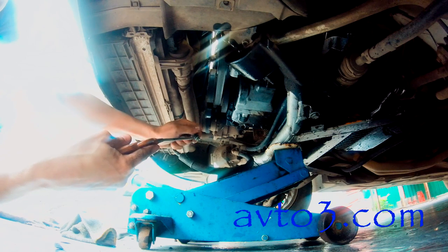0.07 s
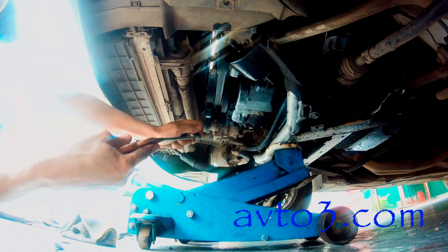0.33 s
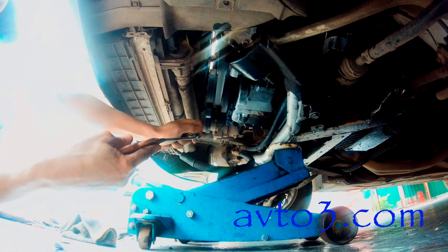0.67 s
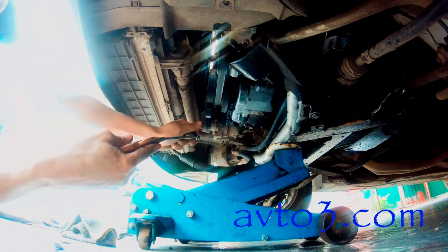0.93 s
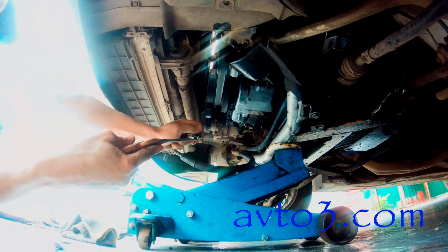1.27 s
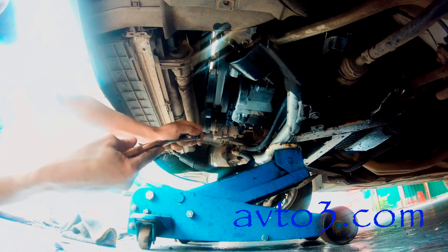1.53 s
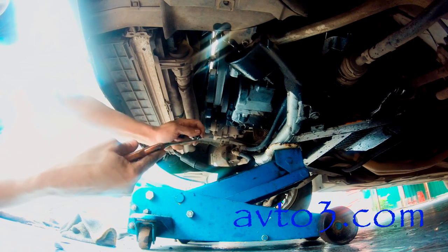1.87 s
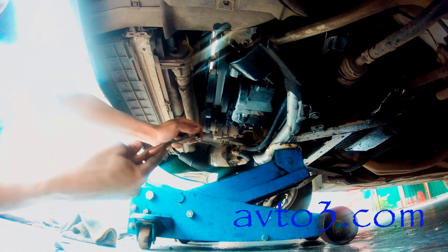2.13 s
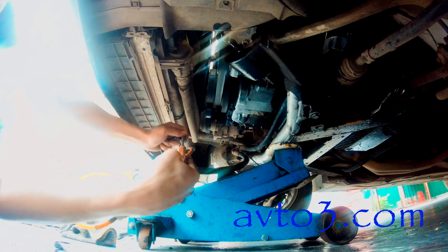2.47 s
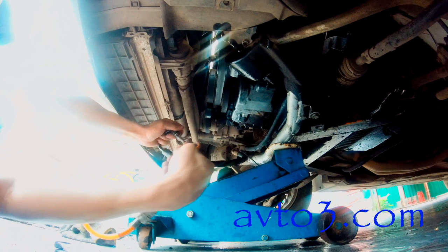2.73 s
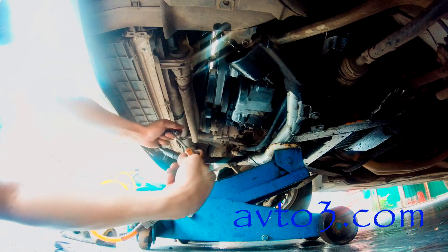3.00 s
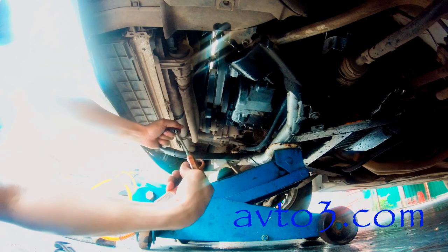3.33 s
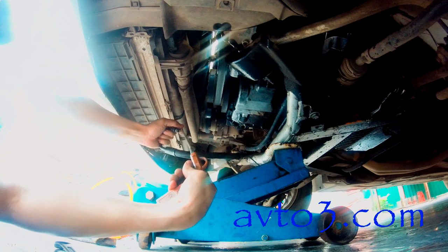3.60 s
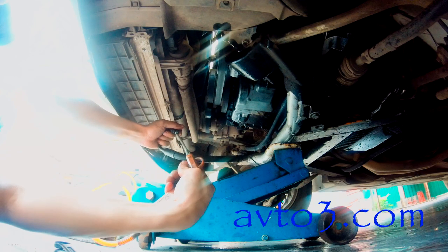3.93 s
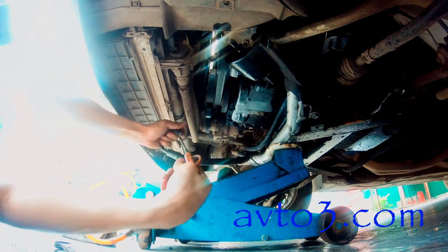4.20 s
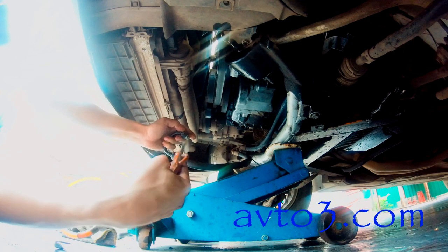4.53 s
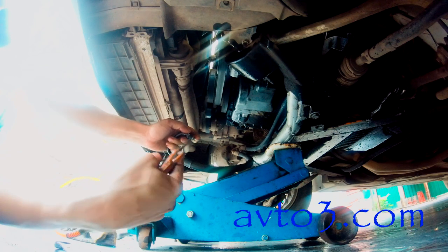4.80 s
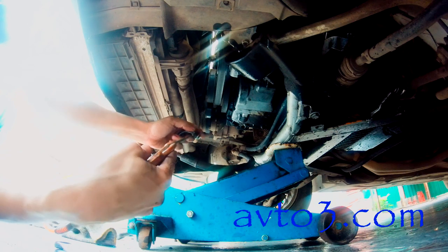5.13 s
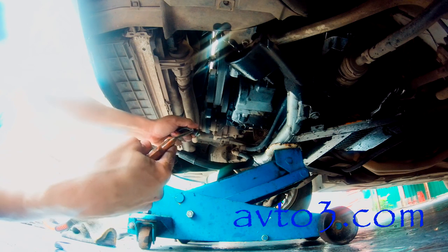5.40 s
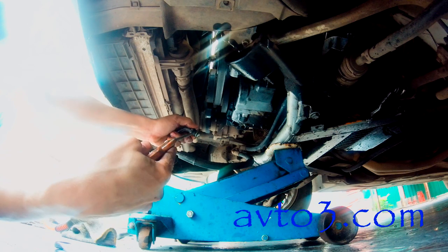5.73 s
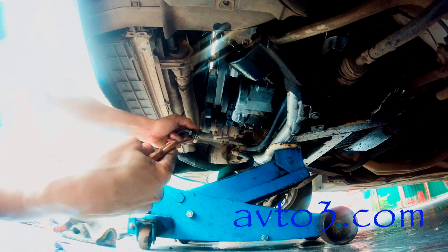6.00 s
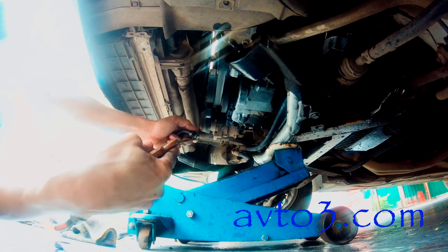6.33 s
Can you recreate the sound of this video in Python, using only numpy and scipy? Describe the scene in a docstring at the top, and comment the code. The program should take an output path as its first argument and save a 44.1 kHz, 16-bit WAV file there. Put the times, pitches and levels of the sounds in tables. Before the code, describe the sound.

Compressed air hisses loudly and without a break from a blow gun into a hose fitting, with spurts and brief whistles.

```python
"""Under a car, a blow gun hisses without a break into a hose fitting, close to a mono microphone.
As the hand moves the nozzle, the turbulent jet glances past or hits it in blasts and quick spurts;
it splashes on metal, whistles over edges, sings in pockets and hoots across the bore.
Resonances of the fitting and the underbody colour the noise. Dirt spits out, trapped air puffs,
and stray air rumbles over the microphone."""
import sys
import numpy as np
from scipy import signal
from scipy.fft import rfft, irfft, next_fast_len
from scipy.io import wavfile
from scipy.ndimage import map_coordinates

SR = 44100
rng = np.random.default_rng(int(sys.argv[2]) if len(sys.argv) > 2 else 0)


def transcribe(signal):
    """Save signal, clipped to [-1, 1], as a 16-bit WAV file at the path in sys.argv[1]."""
    frames = np.atleast_2d(signal).T
    limited = np.clip(frames, -1, 1)
    pcm = np.round(limited * 32767).astype(np.int16)
    wavfile.write(sys.argv[1], SR, pcm)


N = 284930
FRAME = 1024  # samples

# spectrum of stray air: (frequency [Hz], relative level [dB])
DRAUGHT_SPECTRUM = [(15, -7), (35, -3), (70, -1.5), (130, -1), (220, -1), (330, -4.5), (600, -30),
                    (2000, -100)]
# deflected air sweeps over the microphone: (start [s], end [s], added rumble [dB])
DRAUGHT_GUSTS = [(.6, .85, 7), (1.5, 1.75, 3.5), (2.05, 2.5, 7), (4.35, 4.95, 6), (4.62, 4.873, 8.5)]
# puffs of trapped air and spits of dirt:
# (peak time [s], length [s], frequency [Hz], width [Hz], level [dB])
PUFFS_AND_SPITS = [(.655, 0.062, 190, 110, -41.5), (1.172, 0.0066, 6500, 1500, -19),
                   (1.206, .003, 6500, 3500, -14), (1.674, 0.037, 390, 90, -33),
                   (2.103, 0.049, 199, 130, -38.5), (2.123, .006, 6960, 6000, -14),
                   (2.15, 0.0082, 8500, 3500, -16), (2.324, 0.014, 1520, 200, -18.5),
                   (2.498, 0.035, 333, 90, -33), (2.575, 0.043, 170, 90, -39), (3.32, 0.072, 170, 70, -44),
                   (3.685, 0.024, 300, 170, -34), (3.73, 0.028, 287, 220, -29),
                   (3.86, 0.018, 440, 170, -24.5), (3.874, 0.011, 1480, 200, -18.5),
                   (4.002, 0.017, 1520, 350, -16), (4.0, .025, 564, 350, -27.5),
                   (4.016, .008, 5000, 3000, -14), (4.596, 0.017, 1600, 900, -22),
                   (4.634, 0.011, 1390, 1200, -22.5), (4.696, 0.0094, 1510, 1400, -21.5),
                   (4.70, .12, 280, 200, -35.5), (4.724, .009, 4700, 600, -24),
                   (4.731, 0.012, 3900, 600, -23.5), (4.798, 0.0069, 1700, 2000, -19.5),
                   (4.89, 0.053, 326, 110, -34.5)]
# modes of the fitting's bore: (frequency [Hz], width [Hz])
BORE_MODES = [(1450, 150), (3340, 260), (4280, 200)]
# upper modes of the bore when blown hard: (frequency [Hz], width [Hz], relative level [dB])
OVERBLOWN_MODES = [(2460, 80, -5.5), (4700, 160, -1), (5200, 120, -2), (5900, 110, 1), (6340, 130, -20),
                   (7000, 80, -11), (7480, 110, -4), (8350, 220, -18), (10400, 250, 0), (11400, 180, 0.5),
                   (13100, 120, -10), (13800, 200, -7)]
# the jet crosses the bore: (start [s], end [s], mode 1 [dB], mode 2 [dB], mode 3 [dB], overblown [dB])
BORE_CROSSINGS = [(1.628, 1.701, -28.5, -36, -26, -43), (1.756, 1.827, -32.5, -42, -26, -44),
                  (1.859, 1.935, -39, -42, -25, -46), (2.291, 2.327, -27.5, -31, -16.5, -31),
                  (2.325, 2.39, -39, -45, -26, -41), (3.861, 3.982, -35, -27.5, -27, -29.5),
                  (3.976, 4.035, -29, -22, -27, -30), (4.111, 4.184, -34, -30, -36, -37)]
# the jet lingers on a gap or pocket: (start [s], end [s], frequency [Hz], width [Hz], level [dB])
POCKET_TONES = [(0.031, .22, 10800, 900, -25.5), (0.017, .47, 3060, 350, -28),
                (0.357, 0.422, 3100, 350, -22), (0.721, 1.26, 6730, 700, -25.5),
                (1.08, 1.25, 3900, 700, -25.5), (1.331, 1.462, 3150, 500, -31),
                (2.345, 2.39, 10400, 600, -23), (2.4, 3.65, 2023, 160, -33.5),
                (2.505, 2.596, 5000, 800, -22.5), (2.817, 3.017, 2780, 600, -28),
                (3.288, 3.41, 4800, 1100, -22), (3.65, 3.803, 2000, 180, -29.5),
                (3.74, 3.81, 4950, 900, -23), (4.087, 4.25, 2010, 200, -31.5),
                (4.271, 4.324, 5250, 600, -23), (4.985, 5.287, 6530, 300, -24.5),
                (5.374, 5.686, 6400, 350, -24.5), (5.68, 6.048, 3970, 700, -25),
                (5.95, 6.04, 4500, 1800, -22), (6.147, 6.23, 3900, 600, -20),
                (6.156, 6.23, 5900, 1300, -18.5), (6.325, 6.392, 3880, 600, -20.5),
                (6.325, 6.39, 5900, 1300, -24)]
# spectrum of the jet's turbulence: (frequency [Hz], relative level [dB])
JET_SPECTRUM = [(30, -10), (120, -18.5), (300, -6.5), (500, 0.9), (850, -5.5), (1500, -2), (3000, -5),
                (6000, 0.5), (10500, -0.3), (11700, -3.5), (12800, -9.5), (15200, -15.5)]
# peaks and notches of the fitting and the underbody: (frequency [Hz], width [Hz], gain [dB])
CAVITY_RESONANCES = [(566.5, 77, 6.5), (662, 63, 9.5), (717, 440, -11), (1220, 140, -2.5), (1420, 250, 4),
                     (1906, 206, -10), (2000, 620, 11), (2324, 334, -7.5), (2534, 46, 7.5), (3000, 350, 5),
                     (3270, 120, 5), (4330, 720, 9.5), (4484, 610, -8.5), (5090, 310, 3), (5719, 59, -8),
                     (6140, 430, 4), (6440, 194, 4), (6760, 300, 2.5), (7130, 47, -11.5), (7844, 490, -7.5),
                     (8034, 430, 9.5), (14160, 850, 6)]
# low roar of the spreading air: (time [s], relative level [dB])
ROAR_LEVELS = [(0, -36), (.2, -43), (.76, -38), (1.45, -46.5), (2.05, -41), (2.25, -41), (2.48, -34),
               (2.75, -47), (3.1, -40), (3.55, -46), (3.7, -37), (4.25, -39.5), (4.7, -32.5), (5.15, -39),
               (5.32, -43), (5.55, -43.5), (5.98, -38.5), (6.46, -44)]
# the jet glances past as the hand wanders, in relative levels:
# (time [s], hiss [dB], splash on flat metal [dB], share on the rim [dB])
GLANCING_FLOW = [(0.0, 1.5, 5.6, -2.3), (0.33, 0.2, 1.2, -1.5), (0.62, 0.5, -1, -0.4),
                 (0.92, -0.45, -2.5, 2), (1.45, 1.4, -3, -2.5), (1.6, -0.5, -3, -4),
                 (1.85, -1.5, -1.0, -1.5), (1.98, 1.6, -3.5, -1.3), (2.44, -5, 0.5, -0.3),
                 (2.92, -3, 2.5, -0.1), (3.55, -3.5, 2.7, -1.5), (4.07, -3.5, 0.9, 0),
                 (4.47, -9.5, 7, -1.8), (4.77, -6.5, -0.5, -1.8), (5.0, -5.5, 10, 0.5),
                 (5.4, -2.1, 4.2, 0.2), (6.2, -2, 3, -2), (6.46, -1.9, -0.8, 1)]
# the jet hits the fitting squarely: (start [s], end [s], added hiss [dB], added splash [dB])
DIRECT_HITS = [(-0.008, 0.25, 1.9, -6), (0.43, 0.53, 1.7, -2.5), (0.736, 0.84, 1.5, 0.8),
               (0.96, 1.266, 2.0, -1), (1.613, 1.69, 3, -2), (1.77, 1.83, 4, -2.5),
               (2.133, 2.243, 3.5, -2.5), (2.292, 2.406, 4, -1), (2.468, 2.6, 7.2, -2.5),
               (2.602, 2.72, 4.9, -5.5), (3.034, 3.245, 4.5, -4.5), (3.27, 3.425, 5, -2),
               (3.652, 3.807, 3.5, 1.3), (3.866, 4.035, 4, -4.5), (4.103, 4.195, 2, 5.5),
               (4.225, 4.261, 4.0, 2.7), (4.293, 4.328, 6, -2), (4.373, 4.405, 8, 0),
               (4.416, 4.439, 8.5, 0.5), (4.491, 4.546, 7.5, 2.5), (4.58, 4.612, 6.5, 2.1),
               (4.623, 4.645, 5.3, -1), (4.691, 4.707, 6, 9), (4.725, 4.742, 5, 3), (4.79, 4.803, 7.5, 7),
               (4.81, 4.838, 8.5, 4), (4.848, 4.863, 7.5, 3.5), (4.883, 5.28, 5, -3.5),
               (4.912, 4.952, 3.0, 4.5), (5.38, 5.956, 3.5, -4.5), (5.712, 5.785, -1.6, 6),
               (5.943, 6.045, 1, 3), (6.122, 6.21, 1, 3), (6.3, 6.385, 1, 4)]
# hiss bands of flat metal, narrow slot, rim and edge whistle:
# (centre [Hz], width [octaves], resting gain [dB], splash weight [dB/dB], rim weight [dB/dB])
OBSTACLE_BANDS = [(1600, 0.94, -1.27, 1.0, 0), (3300, 0.26, 0.73, -0.32, 0.15), (5080, 0.4, 0, 0.34, 1.0),
                  (6660, 0.15, -0.5, -0.33, 0)]
# the nozzle is partly covered for a moment: (start [s], end [s], gain [dB])
NOZZLE_CHOKES = [(1.285, 1.31, -2.5), (1.718, 1.747, -1.5), (1.83, 1.863, -1), (2.252, 2.284, -0.5),
                 (2.725, 2.793, -3.5), (3.815, 3.844, -2.5), (4.33, 4.37, 0), (5.29, 5.372, -1)]


def amp(db):
    """Amplitude ratio of a level in decibels."""
    return 10 ** (np.asarray(db) / 20)


def unit_rms(x):
    """The signal scaled to an rms of 1."""
    return x / np.sqrt(np.mean(x ** 2) + 1e-20)


def spectrum_db(points, hz):
    """Levels interpolated along a logarithmic frequency axis."""
    frequencies, levels = np.transpose(points)
    return np.interp(np.log(hz + 1), np.log(frequencies + 1), levels)


def curves(rows, t):
    """Each column after the time, interpolated at the times t."""
    times, *columns = np.transpose(rows)
    return [np.interp(t, times, column) for column in columns]


def wobble(rate_hz, t):
    """Random modulation: a spline through rate_hz Gaussian knots a second."""
    knots = rng.standard_normal(int(t[-1] * rate_hz) + 4)
    grid = np.arange(0, len(knots) - 1, 1 / 8)
    return np.interp(t * rate_hz, grid, map_coordinates(knots, [grid]))


def swell(t, start, end):
    """Trapezoidal envelope: quicker sweeps of the hand have shorter ramps."""
    ramp_s = 0.017 + 0.071 * (end - start)
    return np.clip(np.minimum(t - start, end - t) / ramp_s + .5, 0, 1)


def gate(t, start, end, ramp_s=.007):
    """The samples around a span, and a trapezoidal envelope over them."""
    near = (t > start - 2 * ramp_s) & (t < end + 2 * ramp_s)
    return near, np.clip(np.minimum(t[near] - start, end - t[near]) / ramp_s + .5, 0, 1)


def filtered(x, response):
    """Linear filtering: the spectrum is multiplied by a frequency response."""
    size = next_fast_len(len(x) + 2 * FRAME)
    return irfft(rfft(x, size) * response(np.fft.rfftfreq(size, 1 / SR)), size)[:len(x)]


def resonance(hz, centre, width):
    """Resonance curve of a damped oscillator, of height 1."""
    return (hz * width) ** 2 / ((hz * width) ** 2 + (hz ** 2 - centre ** 2) ** 2)


def burst(envelope, centre, width):
    """Random excitation of one resonance, with the shape and energy of the envelope."""
    noise = filtered(rng.standard_normal(len(envelope)), lambda hz: resonance(hz, centre, width))
    return unit_rms(noise * envelope) * np.sqrt(np.mean(envelope ** 2))


def draught(t, rest_db=-54.5, lumps_db=3.8):
    """Wind noise: deflected air reaches the microphone in lumps of pressure, harder during gusts."""
    noise = filtered(rng.standard_normal(N), lambda hz: amp(spectrum_db(DRAUGHT_SPECTRUM, hz)))
    gust_db = sum(db * swell(t, start, end) for start, end, db in DRAUGHT_GUSTS)
    return unit_rms(noise) * amp(rest_db + gust_db + lumps_db * wobble(18, t))


def puffs_and_spits(t):
    """Transient excitation: escaping air or dirt briefly sounds the pocket that it leaves."""
    out = np.zeros(N)
    for peak, length, centre, width, db in PUFFS_AND_SPITS:
        near = abs(t - peak) < 2 * length
        envelope = np.exp(-2 * ((t[near] - peak) / length) ** 2)
        out[near] += amp(db) * burst(envelope, centre, width)
    return out


def bore_hoots(t):
    """Air-column resonance: flow across the bore drives its low and overblown modes, breathily."""
    out = np.zeros(N)
    for start, end, *mode_levels, overblown_db in BORE_CROSSINGS:
        near, blow = gate(t, start, end)
        for db, (centre, width) in zip(mode_levels, BORE_MODES):
            out[near] += amp(db) * burst(blow, centre, width)
        for centre, width, db in OVERBLOWN_MODES:
            out[near] += amp(overblown_db + db) * burst(blow, centre, width)
    return out


def pocket_tones(t):
    """Cavity resonance: each pocket sings one hollow, noisy tone while the jet stays on it."""
    out = np.zeros(N)
    for start, end, centre, width, db in POCKET_TONES:
        near, blow = gate(t, start, end)
        out[near] += amp(db) * burst(blow, centre, width)
    return out


def reflections(x, t, strength=.1, drift_s=.00004, count=12):
    """Comb filtering: short echoes from hands, metal and floor drift as the nozzle moves."""
    total = x.copy()
    for rest_delay_s in rng.uniform(0.000997, .009, count):
        delay_s = rest_delay_s + drift_s * wobble(3, t)
        total += strength * wobble(4.006, t) * map_coordinates(x, [(t - delay_s) * SR])
    return total / np.sqrt(1 + count * strength ** 2)


def turbulence():
    """Source and filter: broadband jet noise coloured by the surrounding cavities, at an rms of 1."""
    def colour(hz):
        cavity_db = sum(db * resonance(hz, centre, width) for centre, width, db in CAVITY_RESONANCES)
        return amp(spectrum_db(JET_SPECTRUM, hz) + cavity_db)
    return unit_rms(filtered(rng.standard_normal(N), colour))


def roar_share(hz, crossover_hz=900):
    """Power crossover: the fraction passed to the roar; the hiss takes the rest."""
    return 1 / (1 + (hz / crossover_hz) ** 6)


def jet_roar(t, gain_db=4.0, low_cut_hz=130):
    """Turbulent mixing: large eddies far from the nozzle radiate an unsteady low roar."""
    roar = filtered(turbulence(), lambda hz: np.sqrt(roar_share(hz)) * hz / np.hypot(hz, low_cut_hz))
    eddies_db = 1.2 * wobble(18, t)
    return unit_rms(roar) * amp(gain_db + curves(ROAR_LEVELS, t)[0] + eddies_db)


def impingement(t):
    """Jet impingement: direct hits shift the glancing flow's levels; gives hiss, splash, rim in dB."""
    hiss_db, splash_db, rim_db = curves(GLANCING_FLOW, t)
    for start, end, added_hiss_db, added_splash_db in DIRECT_HITS:
        hit = swell(t, start, end)
        hiss_db += added_hiss_db * hit
        splash_db += added_splash_db * hit
    return hiss_db, splash_db, rim_db


def jet_hiss(t, gain_db=-16.5):
    """Flow-obstacle noise: small eddies hiss, and each obstacle weights its own range of eddy sizes."""
    hz, frame_times, spectra = signal.stft(turbulence(), SR, nperseg=FRAME)
    _, splash_db, rim_db = impingement(frame_times)
    colour_db = 0
    for centre, octaves, rest_db, by_splash, by_rim in OBSTACLE_BANDS:
        band = np.exp(-.5 * (np.log2((hz[:, None] + 1) / centre) / octaves) ** 2)
        flicker_db = 0.95 * wobble(25, frame_times)
        colour_db += band * (rest_db + by_splash * splash_db + by_rim * rim_db + flicker_db)
    coloured = signal.istft(spectra * amp(colour_db), SR, nperseg=FRAME)[1][:N]
    hiss = filtered(coloured, lambda hz: np.sqrt(1 - roar_share(hz)))
    return hiss * amp(gain_db + impingement(t)[0])


def air_jet(t, flutter_db=0.98, crackle_db=0.78):
    """Amplitude modulation: the jet's flapping flutters its hiss and roar; grit makes them crackle."""
    noise = jet_hiss(t) + jet_roar(t)
    modulation_db = flutter_db * wobble(45, t) + crackle_db * wobble(600, t)
    return reflections(noise * amp(modulation_db), t)


def scene():
    """Superposition at one microphone, fed to both channels; chokes throttle jet and pocket tones."""
    t = np.arange(N) / SR
    opening = amp(sum(db * swell(t, start, end) for start, end, db in NOZZLE_CHOKES))
    mono = opening * (air_jet(t) + pocket_tones(t)) + bore_hoots(t) + puffs_and_spits(t) + draught(t)
    return np.array([mono, mono])


def record(dry, ceiling=.78, hardness=6, top_hz=15330):
    """Soft saturation rounds the highest peaks; a band limit then removes the extreme treble."""
    rounded = dry / (1 + abs(dry / ceiling) ** hardness) ** (1 / hardness)
    return np.array([filtered(channel, lambda hz: hz < top_hz) for channel in rounded])


dry = scene()
out = record(dry)
transcribe(out)
```